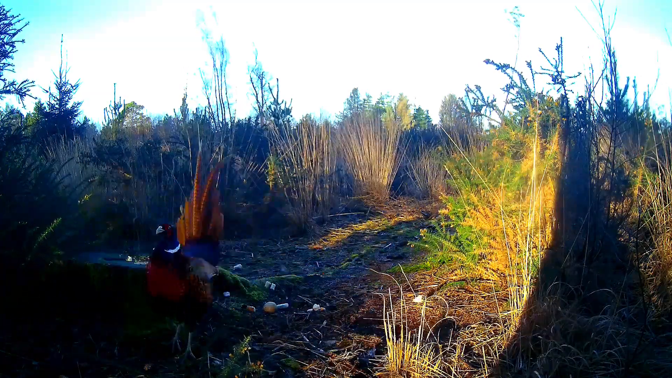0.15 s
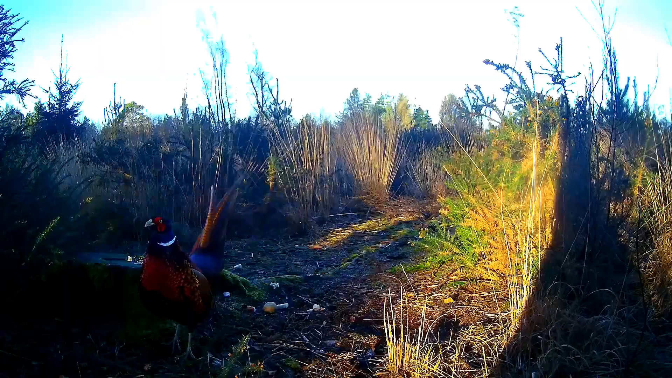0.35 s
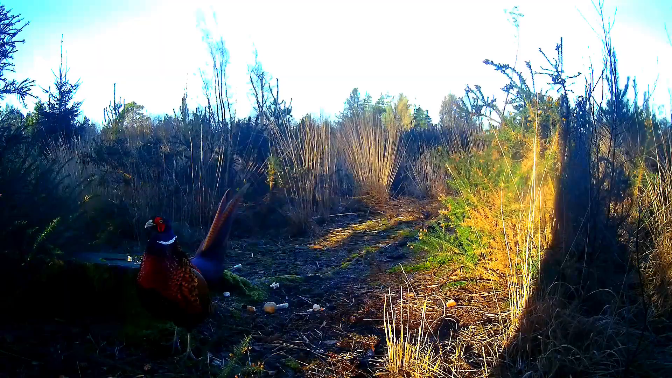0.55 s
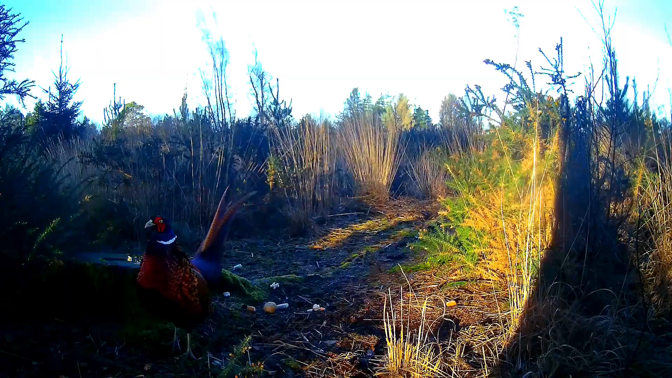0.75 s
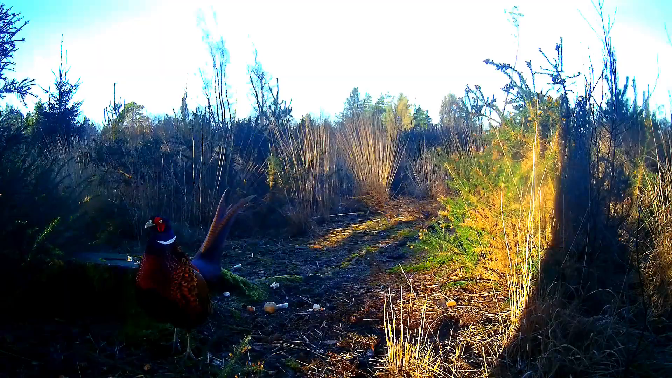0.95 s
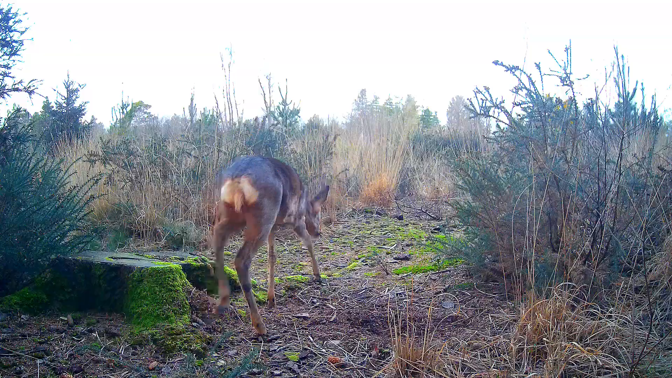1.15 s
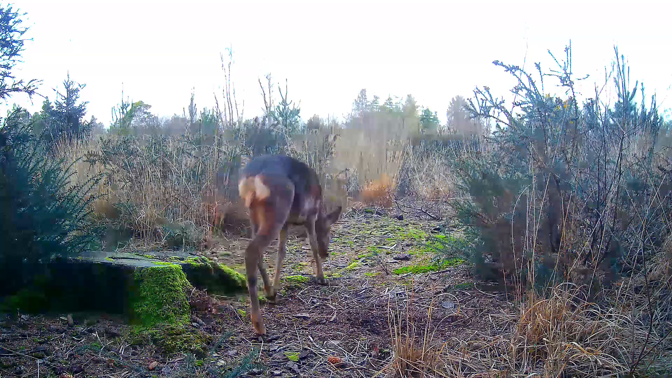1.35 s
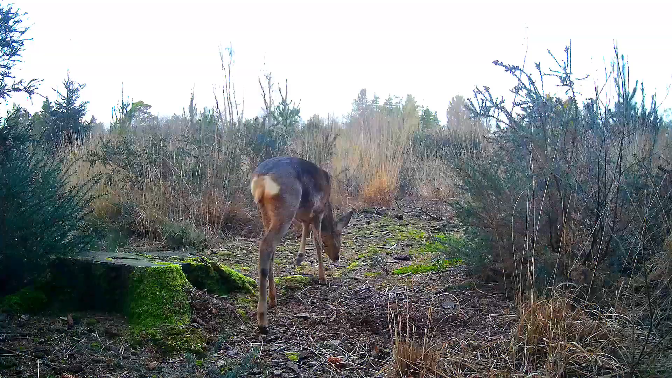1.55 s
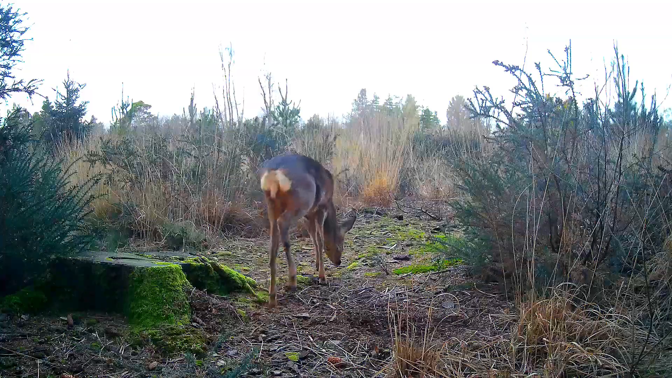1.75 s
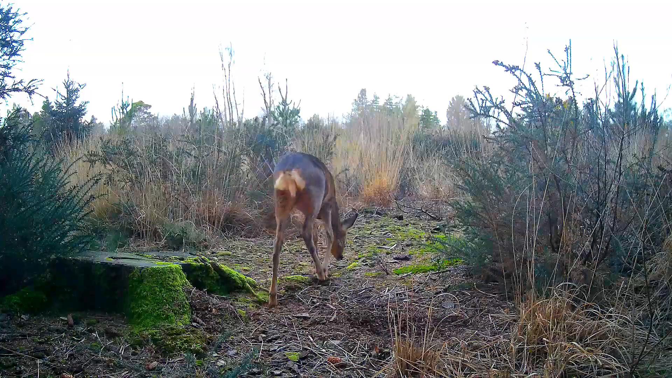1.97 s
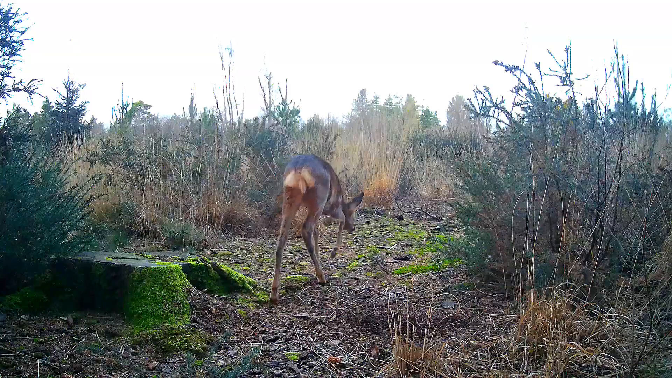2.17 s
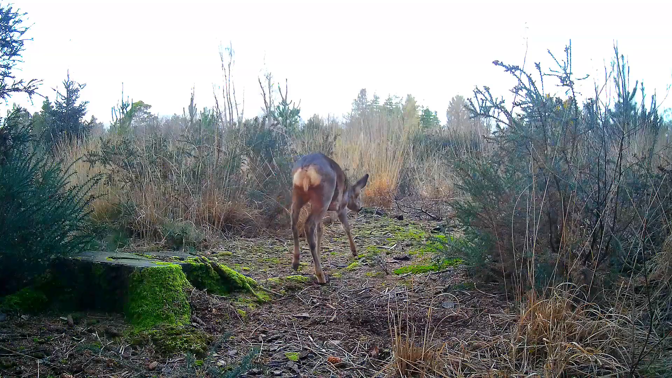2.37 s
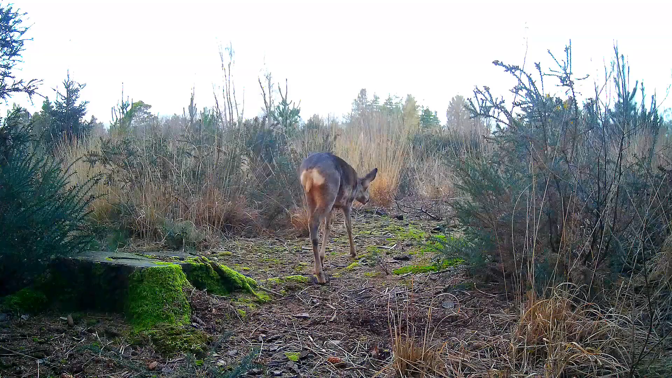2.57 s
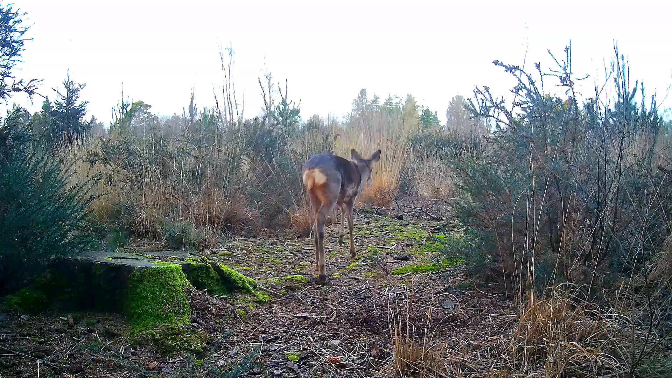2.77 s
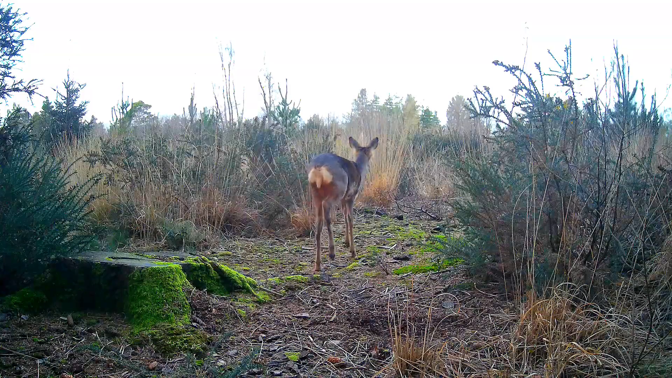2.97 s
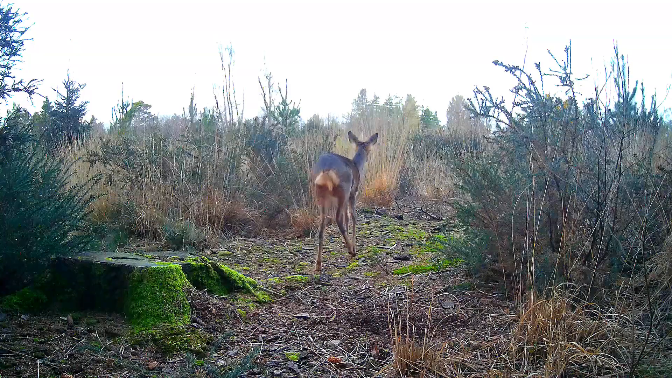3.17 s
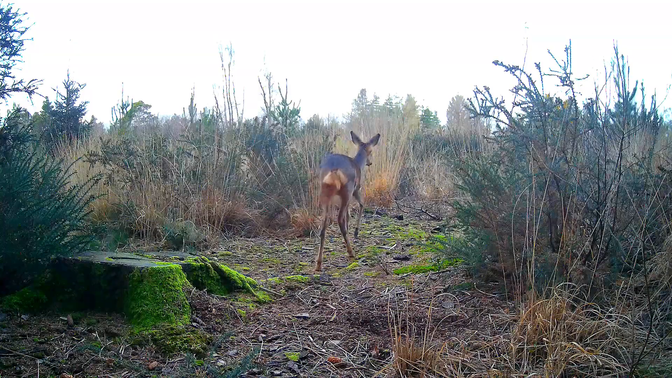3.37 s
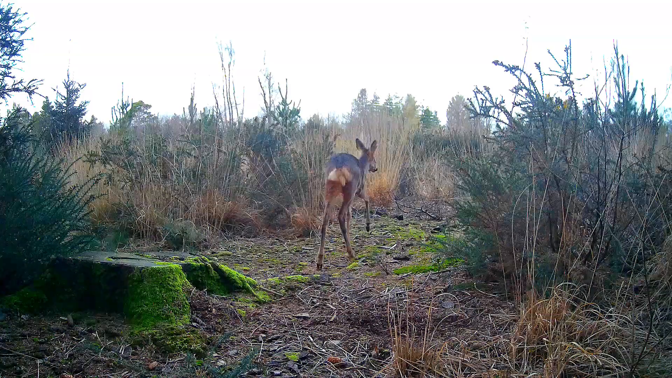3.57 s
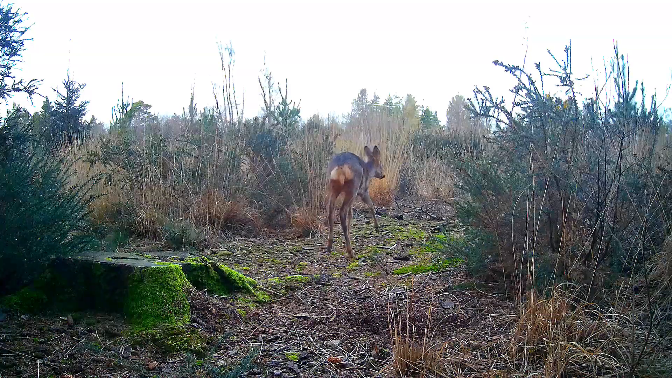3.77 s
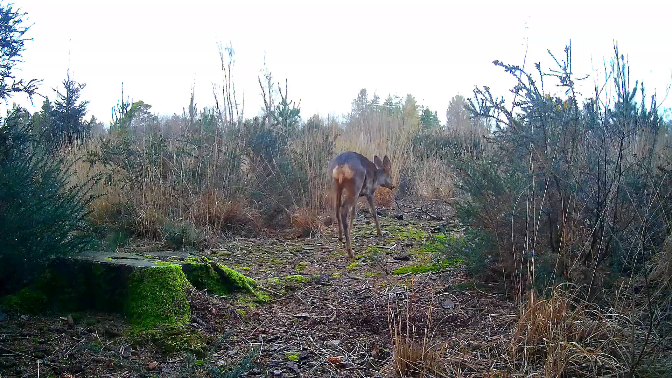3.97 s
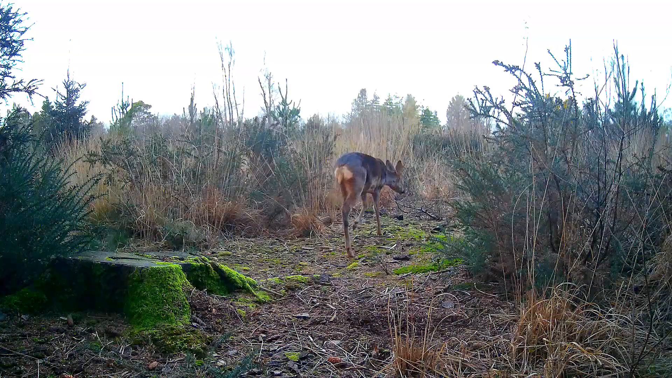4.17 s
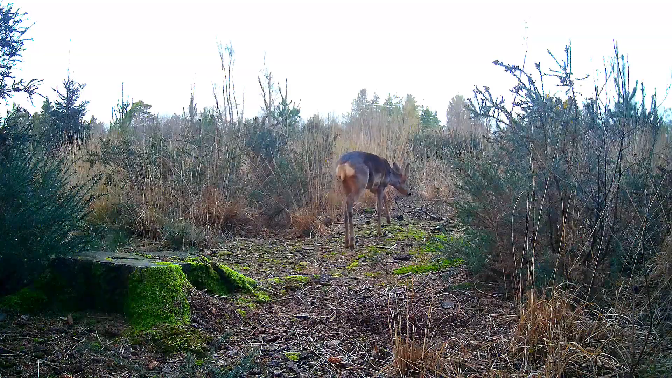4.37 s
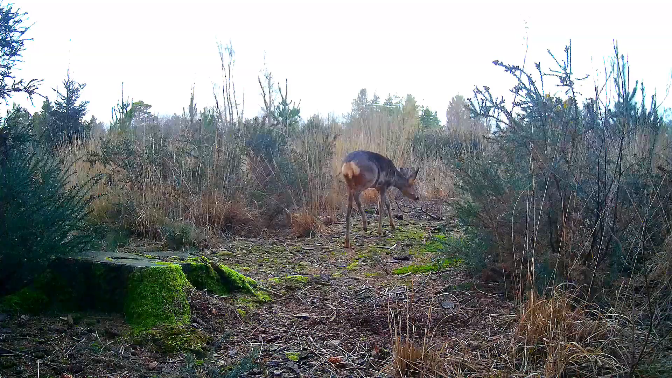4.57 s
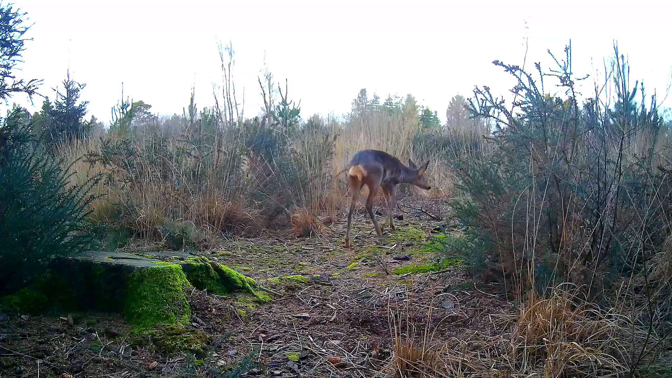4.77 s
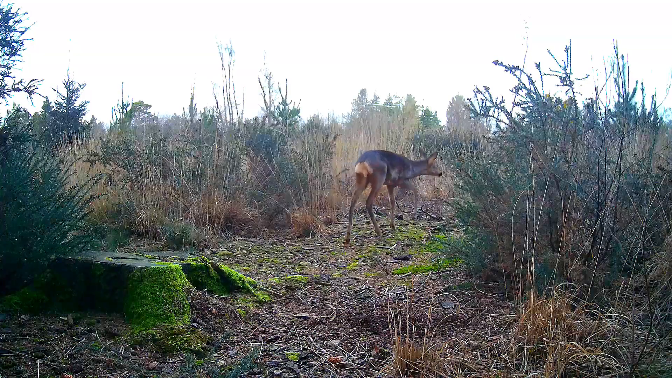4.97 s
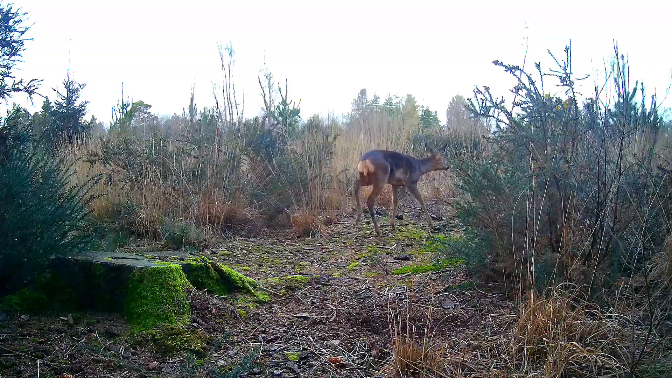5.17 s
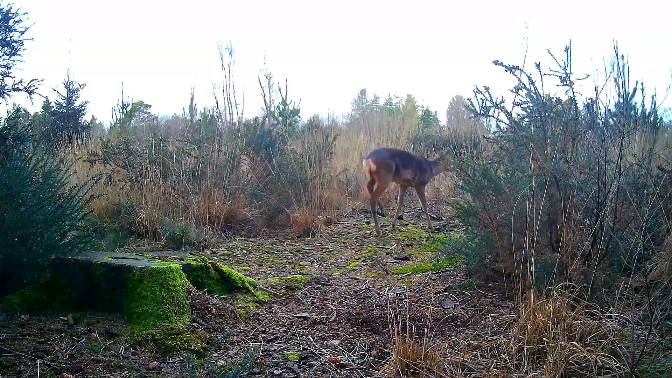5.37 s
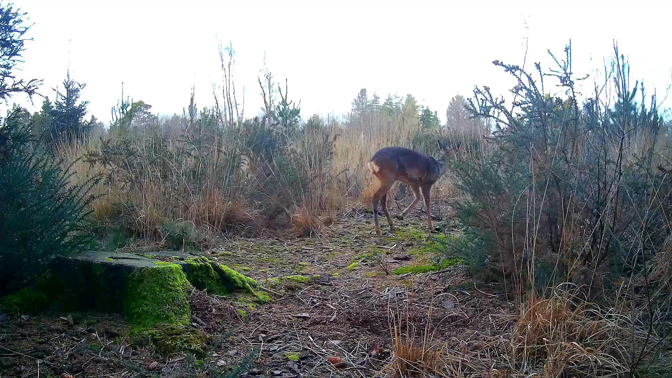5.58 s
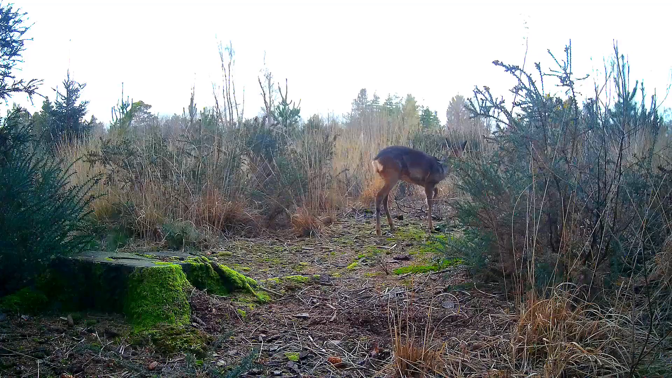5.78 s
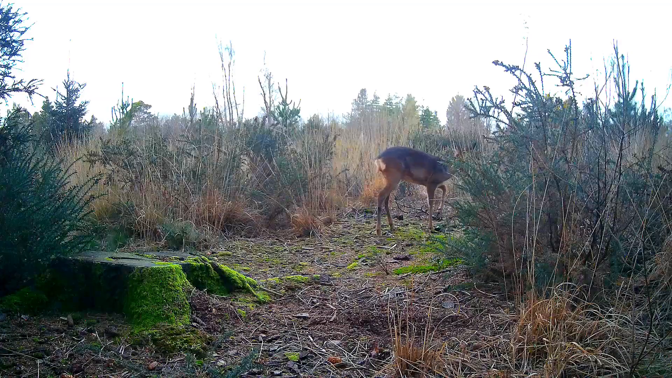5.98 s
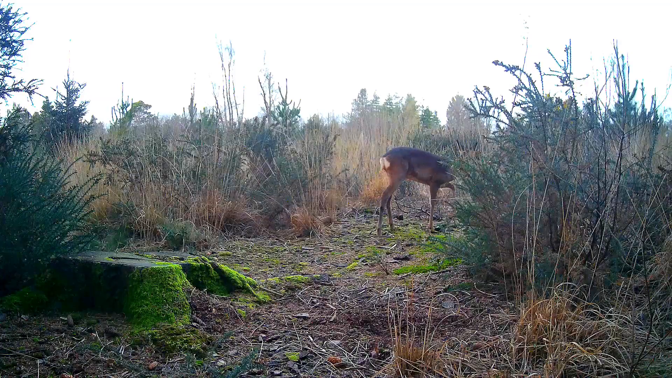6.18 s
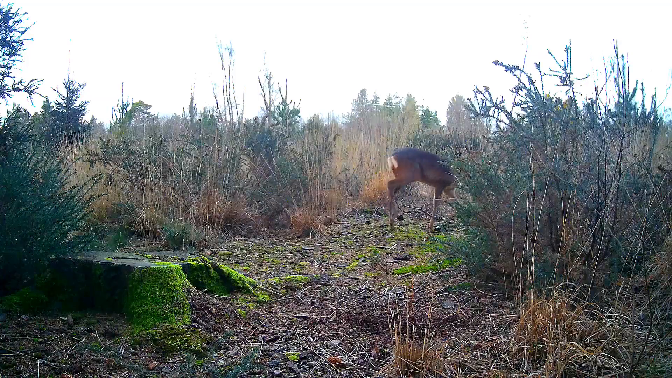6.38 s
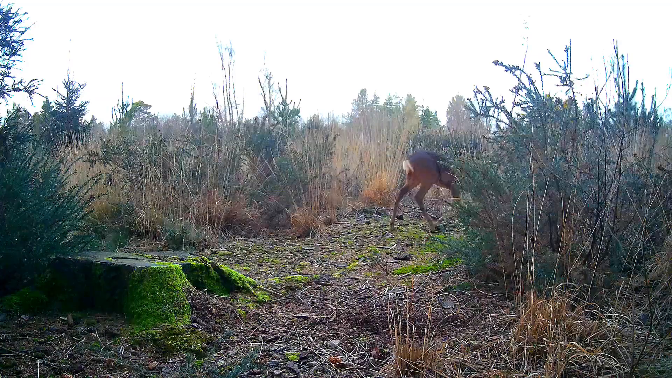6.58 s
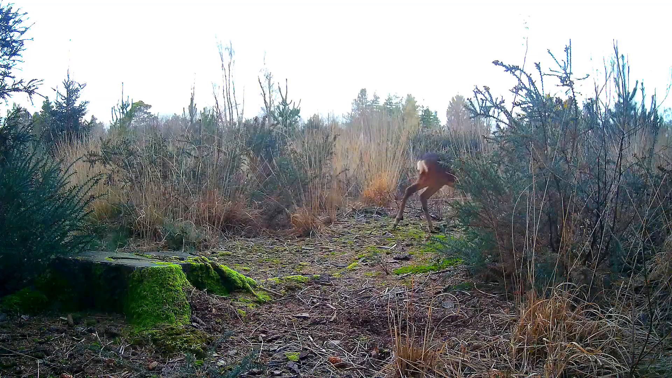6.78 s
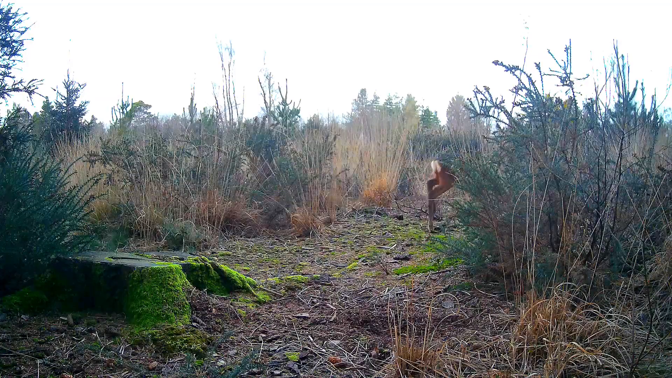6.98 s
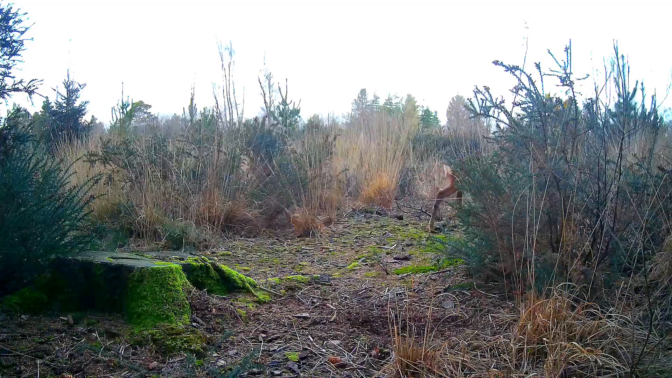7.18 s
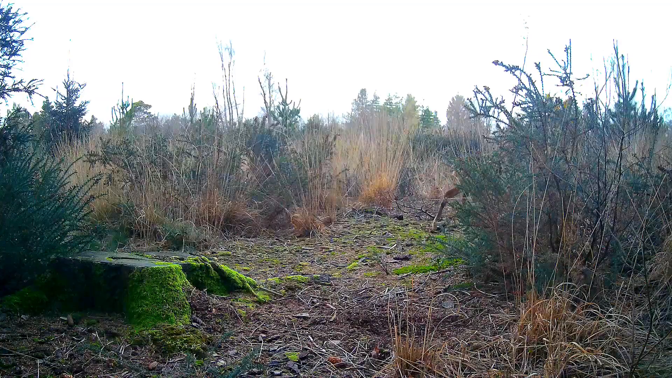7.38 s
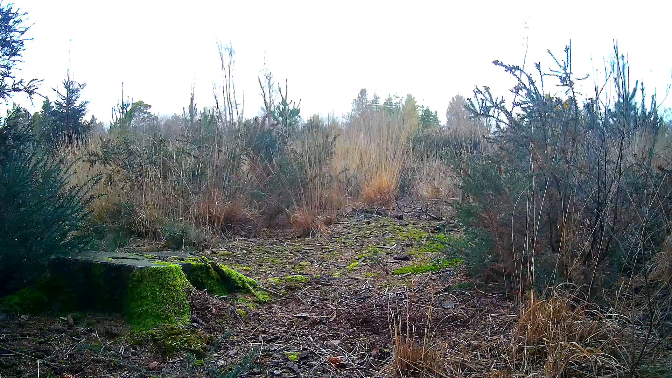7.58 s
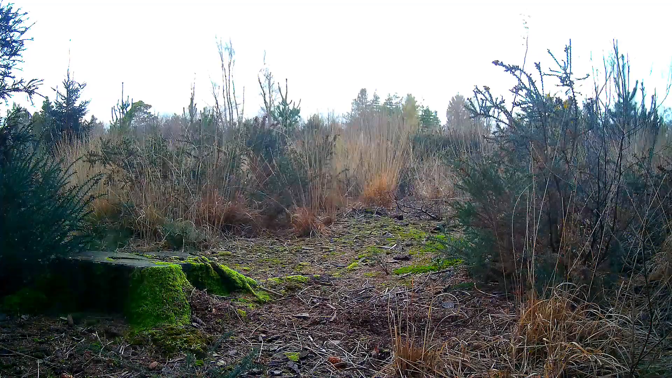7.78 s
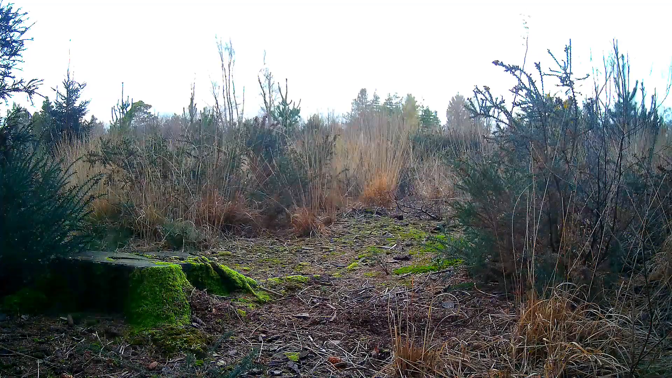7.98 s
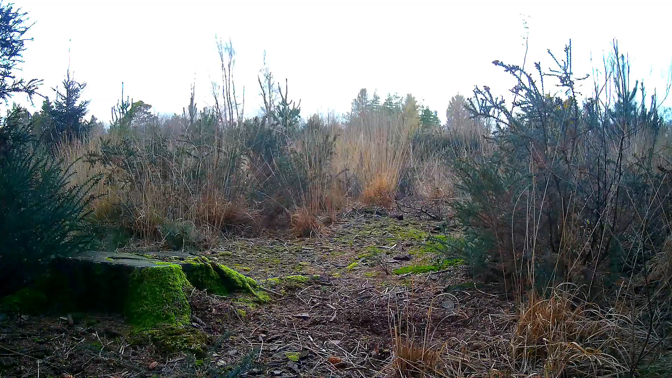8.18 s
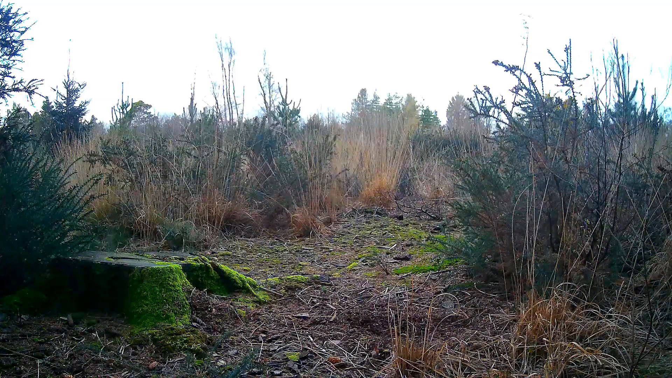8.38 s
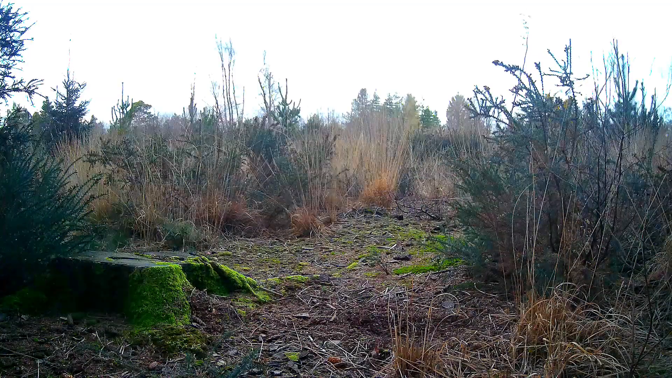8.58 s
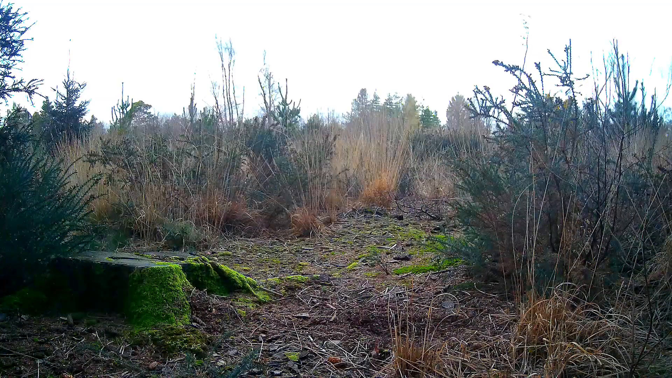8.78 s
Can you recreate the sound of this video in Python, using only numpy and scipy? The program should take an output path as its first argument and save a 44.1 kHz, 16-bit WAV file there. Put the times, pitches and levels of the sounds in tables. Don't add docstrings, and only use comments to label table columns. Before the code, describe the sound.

At a wood's edge, the tail of a pheasant's rapid wing drumming thuds and rustles close and central, gone in a third of a second. A close thrush sings quick bright phrases for nearly two seconds. Fainter, echoing birds follow, with a few dry twig snaps around three seconds. Later come thin distant calls, a high trill and a chattering warbler, over low road hum and small-microphone hiss.

```python
import sys
import numpy as np
from scipy import signal
from scipy.fft import rfft, irfft
from scipy.io import wavfile

SR = 44100
rng = np.random.default_rng(int(sys.argv[2]) if len(sys.argv) > 2 else 0)


def linear_from_db(decibels):
    return 10 ** (np.asarray(decibels, float) / 20)


def store_wav(level_fs):
    pcm = np.round(np.clip(np.atleast_2d(level_fs), -1, 1) * 32767)
    wavfile.write(sys.argv[1], SR, pcm.T.astype(np.int16))


N = 389844

# t/s, depth/dB, width/ms
WING_BEATS = [
    (.0092, -15, 4.2),
    (0.03, -26, 6),
    (.0381, -38, 5.5),
    (0.058, -19.5, 3.9),
    (0.086, -15.5, 3.8),
    (0.096, -22.5, 2.6),
    (0.105, -27, 9.1),
    (.136, -21.5, 2.55),
    (0.1635, -21.5, 4.2),
    (0.1729, -24.5, 2.4),
]
# f/Hz, density/dB
CHURN_SPECTRUM = [(25, 2.5), (60, -5.5), (160, -4.5), (250, -7.5), (380, -10), (600, -67)]
# f/Hz, density/dB
RUSH_SPECTRUM = [(290, -7.5), (500, 0.5), (786, -32), (886, -1), (1140, 4), (2160, -15), (2370, -9),
                 (3170, -21), (4860, -6.5), (7050, -23), (12000, -47), (15600, -63), (22000, -120)]
# t/s, peak level/dB, ring f/Hz
FEATHER_SLAPS = [(.009, -34, 1130), (0.0242, -32, 1090), (.0248, -35.5, 4920), (.0255, -48, 1800),
                 (.055, -39, 1450), (0.0558, -38, 5160), (.08, -33, 1120), (.081, -40.5, 1840),
                 (.094, -34, 1310), (0.1, -37, 4870), (.107, -37, 1220), (0.1334, -32, 1310),
                 (0.169, -41, 1150), (.003, -40, 1180), (.0385, -45, 1300), (.063, -48, 1800),
                 (.088, -34, 1000), (.101, -51, 2380), (.129, -43, 980), (.158, -42, 1000)]
# f/Hz, T60/s, level/dB
CROW_BANDS = [(903, 0.16, -8), (1190, 0.051, -3), (1450, 0.026, -6), (1840, 0.035, -7.5),
              (2370, 0.046, -14.5), (2800, 0.062, -20), (3600, 0.04, -16), (3850, 0.024, -14)]
WINGS_FOLD_S, WHIRR_END_S = 0.17, 0.312
CHURN_DB, CHURN_SAG_DB_PER_S, CHURN_RELEASE_DB_PER_S = -29.5, 82, 328
RUSH_DB, RUSH_SAG_DB_PER_S, RUSH_RELEASE_DB_PER_S = -47, 38, 282
SLAP_RISE_S, SLAP_HISS_DB, CROW_ECHO_DB = 0.0012, -13.5, -48

# f/Hz, density/dB
AIR_SPECTRUM = [(15, -46), (25, 3), (129, -2), (305, -7.5), (1110, -6.5), (3000, -15), (4750, -15),
                (6730, -17), (13900, -18), (15500, -17)]
# f/Hz, side minus mid level/dB
STEREO_WIDTH = [(60, -41), (110, -32), (200, -19), (380, -6), (700, -4), (1290, -4), (2380, -3),
                (4400, -3.5), (8120, -3.5), (15000, -4)]
RUMBLE_TOP_HZ, HUM_TOP_HZ, HISS_TOP_HZ = 340, 2200, 15770
RUMBLE_DB, HUM_DB, HISS_DB, HUM_SAG_DB_PER_S = -67.5, -65.5, -66, 0.24
EARLY_HISS_DB, EARLY_HISS_S = 2, 1
DIP_S, DIP_LENGTH_S, DIP_EDGE_S = 1.09, 0.047, 0.0095
GAP_RUMBLE_DB, GAP_HISS_DB, LATER_RUMBLE_DB = -23, -2, -2.5

# t/s, length/s, rms level/dB, low f/Hz, high f/Hz
RUSTLES = [
    (1.03, .065, -63, 5500, 8500),
    (3.572, .05, -62, 4500, 10000),
    (.045, .16, -65, 8000, 15500),
    (0, .02, -63, 9000, 15500),
    (0.1495, 0.009, -47, 1400, 6500),
]

STROKE_MANNERS = {"swell": (1.07, 9.1, 2.3, 1.2), "scoop": (0.63, 16, 2, 1.5), "hold": (0.39, 2.8, 2, 1.1),
                  "fade": (0.035, 1.9, 9.5, 1.614), "arch": (1.7, 8, 2.5, 1.24),
                  "swoop": (0.096, 2, 11.5, 1.6), "dip": (0.2, 3, 13, 1.7)}
SLUR_S, SLUR_SHARE = 0.004, 0.1
# from t/s, to t/s, swing f/Hz, rate f/Hz
PITCH_BUZZES = [
    (.995, 1.04, 240, 170),
    (6.7, 7.7, 70, 130),
    (2.9, 3.3, 140, 140),
]
# from t/s, to t/s, overtone gain/dB, third over second overtone level/dB
VOICE_STRAINS = [
    (.068, .097, 28.5, -8),
    (.222, .3, 17, -6),
    (0.54, .655, 19, 1),
    (1.35, 1.38, 12, -5),
    (1.78, 1.82, 6, -3),
]
# t/s, length/ms, from f/Hz, goal f/Hz, rms level/dB, manner
THRUSH_SONG = [ (0, 15, 5410, 5180, -48, "fade"), (.022, 6, 6140, 4740, -43, "swell"),
               (.118, 40, 4780, 4770, -61, "fade"), (.048, 29.6, 5810, 4660, -40.5, "fade"),
               (.072, 42, 4745, 4770, -49, "hold"), (.198, 25, 2660, 4300, -50, "scoop"),
               (.222, 28, 4310, 4080, -42.5, "fade"), (.245, 10.2, 4090, 5550, -41, "swell"),
               (.256, 28, 5520, 4160, -42.5, "hold"), (.298, 49, 4400, 4780, -41, "fade"),
               (.408, 15, 4060, 4055, -46, "swell"), (.42, 4.4, 4140, 5030, -42.5, "swell"),
               (.426, 10, 3720, 3100, -53, "swell"), (.436, 12, 3100, 3480, -51, "scoop"),
               (.455, 11, 3360, 3100, -53, "hold"), (.5185, 4.1, 4870, 6260, -44, "hold"),
               (.528, 6.6, 4950, 5340, -38.5, "scoop"), (.534, 18, 5370, 5150, -36, "swoop"),
               (.556, 58, 5200, 5080, -45, "hold"), (.606, 31, 5090, 4940, -44, "hold"),
               (.64, 15, 5040, 5150, -46, "hold"), (.67, 16, 5060, 5130, -41, "swoop"),
               (.694, 5.5, 3250, 3000, -61, "hold"), (.705, 7, 3060, 3780, -49, "scoop"),
               (.712, 12, 3770, 3070, -58, "hold"), (.762, 7.4, 3040, 3500, -50, "scoop"),
               (.769, 18, 3480, 3060, -53.5, "hold"),
               (.814, 8, 4500, 5820, -49, "swell"), (0.823, 11, 5730, 4780, -42.5, "hold"),
                      (.834, 4, 4780, 5030, -41, "hold"), (.8385, 3.6, 4980, 5430, -35, "hold"),
                      (0.843, 8, 5410, 6480, -44.5, "hold"), (.851, 14, 6450, 6700, -42.5, "fade"),
                      (.915, 58, 4840, 4830, -59, "fade"), (.915, 75, 6580, 6670, -61, "fade"),
                      (.935, 27, 3140, 3270, -58, "hold"), (0.966, 40, 3260, 3980, -50.5, "swell"),
                      (1.003, 33, 4040, 3840, -47, "hold"), (1.06, 4.6, 3970, 5320, -43.5, "swell"),
                      (1.0655, 3.6, 5360, 4770, -46, "hold"), (1.079, 11, 4250, 5320, -34.5, "scoop"),
                      (1.089, 9.7, 5330, 5250, -34.5, "hold"), (1.102, 10, 5320, 4430, -43.5, "hold"),
                      (1.116, 5.1, 5410, 4360, -42, "swell"), (1.172, 18.5, 4780, 4710, -43.5, "hold"),
                      (1.21, 24, 4750, 4850, -49, "hold"), (1.235, 19, 4420, 4630, -41, "scoop"),
               (1.32, 32, 2534, 4360, -53, "scoop"), (1.354, 21, 4480, 4446, -47, "hold"),
                     (1.368, 35, 4340, 3994, -47, "hold"), (1.47, 26, 2870, 3330, -54.5, "arch"),
                     (1.5, 25, 3170, 2826, -57, "hold"), (1.524, 21, 2854, 3125, -53, "arch"),
                     (1.547, 17.4, 2820, 3140, -54.5, "swell"), (1.5, 60, 5870, 5930, -66.5, "hold"),
                     (1.638, 24, 5000, 5970, -46, "hold"), (1.659, 6.3, 5930, 5900, -47, "hold"),
                     (1.665, 12, 5820, 5030, -42.5, "hold"), (1.679, 27, 5030, 5400, -40.5, "hold"),
                     (1.746, 5.6, 3640, 4650, -48, "scoop"), (1.752, 6.6, 4650, 4670, -46, "hold"),
                     (1.758, 8.8, 4600, 3100, -53, "fade"), (1.771, 10, 2955, 4770, -43, "scoop"),
                     (1.78, 20.4, 4800, 5250, -38, "swell"), (1.801, 10.3, 5390, 5240, -37.5, "hold"),
                     (1.816, 26, 5180, 4430, -44.5, "hold")]
DEEP_CALLS = [
    (1.7, 210, 5900, 5880, -72, "fade"),
    (3.14, 140, 4600, 5800, -81, "hold"),
    (2.5, 245, 6850, 6830, -82, "hold"),
    (2.57, 114, 5000, 5400, -80, "hold"),
    (2.82, 140, 5100, 4200, -77, "hold"),
    (7.86, 60, 5500, 5900, -75, "hold"),
    (1.59, 45, 5150, 5350, -68, "swell"),
]
SECOND_THRUSH_SONG = [ (2.196, 13, 5700, 4880, -59.5, "swell"),
                      (2.24, 12, 3580, 4600, -62.5, "scoop"), (2.252, 97, 4680, 4610, -67, "hold"),
                      (2.345, 20, 4570, 4100, -68, "hold"), (2.37, 110, 4040, 3950, -80, "hold"),
                      (2.343, 80, 5480, 6500, -63.5, "scoop"),
                      (2.548, 11, 4120, 5090, -62, "swell"), (2.566, 12, 5750, 4760, -63, "hold"),
                      (2.58, 20, 3900, 3400, -70, "hold"), (2.612, 38, 3550, 3840, -72, "scoop"),
                      (2.72, 25, 5460, 5300, -66, "hold"), (2.75, 12, 6800, 6970, -65, "fade"),
                      (2.762, 28, 6970, 5680, -65, "swell"), (2.828, 52, 5560, 5370, -63.5, "fade"),
                      (2.878, 15.7, 7100, 6100, -61.5, "swell"),
                      (2.915, 15, 5100, 5000, -71, "hold"),
                      (2.963, 14, 4050, 3300, -69, "hold"), (2.985, 69, 4586, 4650, -61, "hold"),
                            (3.056, 62, 4640, 4646, -61, "fade"), (3.09, 40, 3550, 3540, -74, "hold"),
                            (3.272, 60, 5800, 5900, -74, "fade"), (3.292, 17, 5500, 4800, -66, "hold"),
                            (3.32, 13, 3540, 5560, -76, "hold"), (3.337, 120, 5570, 5640, -70, "swoop"),
                            (3.418, 61, 6990, 6710, -62, "hold"), (3.48, 40, 6710, 6260, -62, "hold"),
                            (3.52, 42, 6250, 5530, -66, "fade"), (3.574, 24, 1850, 3400, -64, "hold"),
                            (3.598, 21, 3400, 4480, -57, "hold"), (3.619, 47, 4500, 4350, -52, "swoop"),
                            (3.58, 24, 3950, 7400, -64, "swell")]
FAR_CALLS = [ (4.01, 85, 4900, 5700, -74, "hold"), (4.57, 50, 7000, 7600, -75, "hold"),
             (4.65, 45, 4650, 4900, -80, "hold"), (5.31, 14, 4750, 4850, -72, "hold"),
             (5.598, 45, 6250, 5550, -72, "scoop"), (5.652, 45, 5250, 4450, -77, "hold"),
             (5.608, 28, 3500, 3460, -72, "hold"), (5.76, 65, 4200, 4050, -74, "scoop"),
             (5.53, 40, 3900, 4000, -79, "hold"), (5.86, 60, 8500, 8400, -75, "hold"),
             (7.885, 28, 5850, 5850, -69, "hold"), (7.993, 50, 4960, 4900, -67, "fade"),
             (7.91, 22, 4900, 4800, -71, "hold")]
LOW_SONG = [ (6.06, 14, 3780, 3760, -71, "hold"), (6.11, 29, 3640, 3370, -71, "hold"),
            (6.145, 27, 3350, 3780, -59.5, "swell"), (6.172, 10, 3780, 3730, -62, "hold"),
            (6.178, 18, 3350, 3290, -64, "hold"), (6.194, 42, 3330, 3830, -61, "swell"),
            (6.238, 14.8, 3890, 3836, -58, "hold"), (6.258, 41, 3850, 3850, -67, "fade"),
            (6.25, 77, 3400, 3450, -72.5, "hold"), (6.335, 68, 3910, 3860, -78, "hold"),
            (6.29, 20, 4980, 4800, -76, "hold"), (8.64, 96, 4690, 4010, -62.5, "swoop"),
            (8.725, 12.4, 4000, 4500, -53.5, "swell"), (8.736, 11.4, 4560, 4520, -55, "hold"),
            (8.815, 9, 3790, 3780, -62, "hold"), (8.826, 13, 4360, 2830, -57, "swell")]
HIGH_SONG = [ (6.905, 50, 7300, 7160, -64.5, "hold"), (6.965, 17, 7150, 6800, -63, "fade"),
             (7.035, 11, 7000, 7240, -65, "scoop"), (7.047, 61, 7230, 7150, -66, "hold"),
             (7.255, 81, 8370, 7970, -58, "swell"), (7.265, 25, 7510, 7650, -63, "scoop"),
             (7.345, 25, 7660, 7960, -61, "swell"), (7.37, 40, 8000, 7340, -59, "fade"),
             (7.348, 82, 9200, 8080, -50, "scoop"), (7.43, 56, 8100, 7970, -47, "fade"),
             (7.475, 61, 7950, 7230, -59, "hold"), (7.525, 150, 7250, 7200, -66, "fade")]
WARBLER_SONG = [ (7.789, 9.4, 3850, 4120, -58, "hold"), (7.802, 10, 3540, 2620, -53, "hold"),
                (7.812, 27, 3030, 2170, -57.5, "hold"), (7.837, 25, 2160, 2080, -53, "swoop"),
                (7.827, 7, 3230, 3530, -62, "swell"), (7.822, 14, 5000, 4320, -67, "hold"),
                (7.836, 30, 4330, 4150, -66, "hold"), (7.942, 6.4, 3360, 4040, -59, "hold"),
                (7.958, 5.8, 2930, 3800, -62, "fade"), (7.964, 20, 2810, 2060, -57.5, "fade"),
                (7.978, 20, 3375, 3430, -55.5, "fade"), (8.003, 22, 3360, 3470, -66, "hold"),
                (8.033, 8, 3600, 4100, -52.5, "swell"), (7.877, 14, 2700, 2800, -70, "hold"),
                (7.883, 10, 2000, 2030, -71, "hold"), (8.0, 5, 1530, 2080, -60, "swell"),
                (8.022, 15, 1700, 1880, -67, "fade"),
                (8.051, 7, 2100, 2600, -67, "hold"), (8.063, 6.4, 2710, 2750, -61, "hold"),
                      (8.075, 12, 2920, 2650, -64, "hold"), (8.111, 6, 3020, 2820, -64, "hold"),
                      (8.112, 5, 4080, 3850, -68, "hold"), (8.21, 5, 2500, 2950, -65, "hold"),
                      (8.078, 13.5, 3590, 4020, -53.5, "swell"), (8.099, 11, 2590, 3310, -58.5, "arch"),
                      (8.118, 22, 2260, 2340, -61, "swell"), (8.133, 10, 3600, 4000, -58, "arch"),
                      (8.12, 20, 4580, 4670, -65, "swell"), (8.15, 7.3, 2500, 3130, -61, "hold"),
                      (8.158, 21, 3140, 2400, -68, "fade"), (8.186, 7, 3850, 3530, -54, "hold"),
                      (8.199, 4.4, 2210, 2860, -59, "swell"), (8.231, 29, 3300, 3490, -68, "hold"),
                      (8.296, 23, 2890, 3250, -69, "hold")]
# t/s, top f/Hz, rms level/dB
VEE_CALLS = [
    (4.232, 5950, -72.5),
    (4.714, 5420, -67.5),
    (5.181, 5460, -71),
]
VEE_FALL_MS, VEE_FALL_SHARE, VEE_TURN_S = 110, 0.7, 0.12
VEE_RISE_MS, VEE_RISE_SHARE, VEE_RISE_LOSS_DB = 55, 0.76, 3
# t/s, rms level/dB, rise delay/s
DEEP_FIGURES = [
    (6.27, -74, .275),
    (6.82, -72, .295),
    (7.38, -71, 0.34),
]
# delay/s, length/ms, from f/Hz, goal f/Hz, loss/dB, manner
DEEP_FALL, DEEP_FLICK = (0, 135, 5150, 4080, 0, "hold"), (0.14, 45, 4350, 5150, 1.5, "hold")
DEEP_RISE = (0, 170, 4850, 6260, 0.34, "fade")
DEEP_LOW = (0.131, 97, 4070, 4050, 5.2, "fade")
DEEP_RETURN_S, DEEP_RETURN_DB = 0.065, -12.5
SINGER_PERCHES = {"thrush": (1.2, 36.5, -2.5, -13, -38, 2), "high": (-5.7, 6.8, -8.5, -9, -36, 0.6),
                  "far": (8.5, 33, -4, -8, -41, 2.2), "low": (-9, 2, 5, -5, -36, 4),
                  "warbler": (-8, 6, -2, -4, -28, 2), "second thrush": (-9, 13, 3.5, -9, -34, 3),
                  "deep": (3, 25, 7, 2, -41, 3.5)}
WOOD_T60_S, FIRST_ECHO_S = 0.42, 0.0041
FAR_TREES_S, FAR_TREES_T60_S, WOOD_LEFT_RIGHT_DB = 0.12, 0.98, -0.5

# t/s, peak level/dB, ring f/Hz, left-right/dB
TWIG_SNAPS = [
    (2.556, -42, 2920, 6),
    (3.205, -30.5, 2730, 5.5),
    (3.7174, -50, 5600, 0.0),
]


def rms_one(x):
    return x / np.sqrt(np.mean(x ** 2) + 1e-20)


def drift(rate_hz):
    r = np.exp(-2 * np.pi * rate_hz / SR)
    return rms_one(signal.lfilter([1], [1, -2 * r, r * r], rng.standard_normal(N)))


def at_hz(points, hz):
    f, level_db = np.array(points).T
    return np.interp(np.log(hz + 1), np.log(f), level_db)


def panned(x, left_right_db):
    return x * linear_from_db(np.array([[0.5], [-0.5]]) * left_right_db)


def coloured(spectrum, low_hz=0, high_hz=SR, side_db=0):
    hz = np.fft.rfftfreq(N, 1 / SR)
    shape = linear_from_db(at_hz(spectrum, hz)) * (hz > low_hz) * (hz <= high_hz)
    mid, side = rfft(rng.standard_normal((2, N))) * shape
    mid = irfft(mid, N)
    side = irfft(side * linear_from_db(at_hz(STEREO_WIDTH, hz) + side_db), N)
    return np.array([mid + side, mid - side]) / np.std(mid)


def ring(clicks, hz, t60):
    r, w = linear_from_db(-60 / (t60 * SR)), 2 * np.pi * hz / SR
    return signal.lfilter([0, np.sin(w)], [1, -2 * r * np.cos(w), r * r], clicks + 1e-18)


def wings():
    t, strokes, slaps = np.arange(N) / SR, np.zeros(N), np.zeros(N)
    for s, depth_db, width_ms in WING_BEATS:
        u = (t[:SR] - s) / (width_ms * 0.00066)
        strokes[:SR] -= linear_from_db(depth_db) * (1 - u ** 2 / 1.37) * np.exp(-u ** 2 / 2)
    for s, slap_db, hz in FEATHER_SLAPS:
        since = np.maximum(t[:SR] - s, 0)
        clap = linear_from_db(slap_db) * since / SLAP_RISE_S * np.exp(1 - since / SLAP_RISE_S)
        strokes[:SR] += clap * np.sin(2 * np.pi * hz * since)
        slaps[:SR] += linear_from_db(SLAP_HISS_DB) * clap
    beating, folded = np.minimum(t, WINGS_FOLD_S), np.maximum(t - WINGS_FOLD_S, 0)
    churn_db = CHURN_DB - CHURN_SAG_DB_PER_S * beating - CHURN_RELEASE_DB_PER_S * folded
    rush_db = RUSH_DB - RUSH_SAG_DB_PER_S * beating - RUSH_RELEASE_DB_PER_S * folded
    churn = linear_from_db(churn_db) * coloured(CHURN_SPECTRUM, side_db=-47)
    rush = (linear_from_db(rush_db) + slaps) * coloured(RUSH_SPECTRUM, side_db=-46)
    breath = rng.standard_normal(N)
    echo = sum(linear_from_db(db) * rms_one(ring(breath, hz, t60)) for hz, t60, db in CROW_BANDS)
    echo_db = rush_db - RUSH_DB + CROW_ECHO_DB + 3.1 * drift(66)
    over = np.clip((WHIRR_END_S - t) / 0.03, 0, 1)
    return strokes + over * (churn + rush + linear_from_db(echo_db) * echo)


def background():
    t = np.arange(N) / SR
    gap = np.clip(np.minimum(t - DIP_S, DIP_S + DIP_LENGTH_S - t) / DIP_EDGE_S, 0, 1)
    later = t > DIP_S + DIP_EDGE_S
    rumble_db = RUMBLE_DB + LATER_RUMBLE_DB * later + GAP_RUMBLE_DB * gap
    hum_db = HUM_DB - HUM_SAG_DB_PER_S * t
    hiss_db = HISS_DB + EARLY_HISS_DB * np.exp(-t / EARLY_HISS_S) + GAP_HISS_DB * gap
    rumble = linear_from_db(rumble_db) * coloured(AIR_SPECTRUM, 20, RUMBLE_TOP_HZ)
    hum = linear_from_db(hum_db) * coloured(AIR_SPECTRUM, RUMBLE_TOP_HZ, HUM_TOP_HZ)
    hiss = linear_from_db(hiss_db) * coloured(AIR_SPECTRUM, HUM_TOP_HZ, HISS_TOP_HZ)
    return rumble + hum + hiss


def rustles():
    out, t = np.zeros((2, N)), np.arange(N) / SR
    for s, length_s, level_db, low_hz, high_hz in RUSTLES:
        swell = np.sin(np.pi * np.clip((t - s) / length_s, 0, 1))
        hiss = coloured(AIR_SPECTRUM, low_hz, high_hz, side_db=-15)
        out += linear_from_db(level_db + 0.99 * drift(60)) * swell * hiss
    return out


def songs():
    vees = []
    for s, hz, db in VEE_CALLS:
        vees.append((s, VEE_FALL_MS, hz, VEE_FALL_SHARE * hz, db, "dip"))
    for s, hz, db in VEE_CALLS:
        vees.append((s + VEE_TURN_S, VEE_RISE_MS, VEE_RISE_SHARE * hz, hz, db - VEE_RISE_LOSS_DB, "hold"))
    rounds = []
    for s, db, pause in DEEP_FIGURES:
        for wait, stroke in [(0, DEEP_FALL), (0, DEEP_LOW), (0, DEEP_FLICK), (pause, DEEP_RISE)]:
            after, ms, from_hz, goal_hz, loss_db, manner = stroke
            rounds.append((s + wait + after, ms, from_hz, goal_hz, db - loss_db, manner))
    returns = [(s + DEEP_RETURN_S, ms, from_hz, goal_hz, db + DEEP_RETURN_DB, manner)
               for s, ms, from_hz, goal_hz, db, manner in rounds]
    return {"thrush": THRUSH_SONG,
            "deep": DEEP_CALLS + rounds + returns,
            "second thrush": SECOND_THRUSH_SONG,
            "far": FAR_CALLS + vees, "low": LOW_SONG, "high": HIGH_SONG,
            "warbler": WARBLER_SONG}


def notes(strokes):
    song, u = [], np.linspace(0, 1, num=9)
    for s, length_ms, from_hz, goal_hz, level_db, manner in strokes:
        loudest, swell_db, fade_db, ease = STROKE_MANNERS[manner]
        way = np.sin(np.pi * u) ** ease if manner == "arch" else 1 - (1 - u) ** ease
        shape_db = np.interp(u, [0, np.clip(loudest, 0, 1), 1], [-swell_db, 0, -fade_db])
        pitch = from_hz + (goal_hz - from_hz) * way
        note = np.transpose([s + u * length_ms / 1000, pitch, level_db + shape_db])
        if song:
            _, last_hz, _ = song[-1][-1]
            near_in_time = abs(s - song[-1][-1, 0]) < SLUR_S
            if near_in_time and abs(from_hz / last_hz - 1) < SLUR_SHARE:
                before = song.pop()
                note = np.vstack([before[before[:, 0] < note[1, 0]], note[1:]])
        song.append(note)
    return song


def whistle(song, lead_us, overtone_db):
    out, unsteady = np.zeros((2, N)), 1 + 0.003 * drift(55)
    for note in song:
        s, hz, level_db = np.transpose(note)
        first, last = round((s[0] - 0.002) * SR), round((s[-1] + 0.0013) * SR)
        at = np.arange(max(first, 0), min(last, N))
        t = at / SR
        pitch = np.interp(t, s, hz) * unsteady[at]
        for start, end, swing_hz, rate_hz in PITCH_BUZZES:
            pitch += swing_hz * np.sin(2 * np.pi * rate_hz * t) * (t > start) * (t < end)
        lead_turns = pitch * lead_us / 10 ** 6 * [[0.5], [-0.5]]
        phase = 2 * np.pi * (np.cumsum(pitch) / SR + lead_turns)
        fade = np.clip(np.minimum(t - t[0], t[-1] - t) / 0.0019, 0, 1)
        strain_db = sum(gain_db * (t > start) * (t < end) for start, end, gain_db, _ in VOICE_STRAINS)
        third_db = sum(db * (t > start) * (t < end) for start, end, _, db in VOICE_STRAINS)
        overtones = np.sin(2 * phase) + linear_from_db(third_db) * np.sin(3 * phase)
        tone = np.sin(phase) + linear_from_db(overtone_db + strain_db) * overtones
        level = np.sqrt(2) * linear_from_db(np.interp(t, s, level_db))
        out[:, at] += level * np.sin(fade * np.pi / 2) ** 2 * tone
    return out


def wood(x, far_trees_db):
    t = np.arange(SR) / SR
    far = linear_from_db(far_trees_db - 60 * t / FAR_TREES_T60_S) * np.minimum(t / FAR_TREES_S, 1) ** 2
    decay = (linear_from_db(-60 * t / WOOD_T60_S) + far) * np.clip(t / FIRST_ECHO_S - 1, 0, 1)
    cloud = rng.standard_normal((2, SR)) * decay / np.sqrt(np.sum(decay ** 2))
    leaves = signal.butter(2, 9500, fs=SR, output="sos")
    cloud = signal.sosfilt(leaves, cloud)
    return signal.oaconvolve(x[None], cloud, axes=1)[:, :N]


def singers():
    out = np.zeros((2, N))
    for singer, strokes in songs().items():
        left_right_db, lead_us, echo_db, far_trees_db, overtone_db, shimmer_db = SINGER_PERCHES[singer]
        voice = whistle(notes(strokes), lead_us, overtone_db)
        direct = linear_from_db(shimmer_db * drift(60)) * voice
        out += panned(direct, left_right_db)
        out += panned(linear_from_db(echo_db) * wood(voice[0], far_trees_db), WOOD_LEFT_RIGHT_DB)
    return out


def twigs():
    out = np.zeros((2, N))
    for s, peak_db, hz, left_right_db in TWIG_SNAPS:
        click = np.zeros(N)
        click[round(s * SR) + 20] = -linear_from_db(peak_db - 7.0)
        snap = ring(click, hz, 0.0087)
        snap += 1.1 * ring(click, 1.48 * hz, 0.0038)
        snap += 0.33 * ring(click, 3.2 * hz, 0.002)
        snap += 0.1 * ring(click, 0.48 * hz, 0.027)
        out += panned(snap, left_right_db)
    return out


def scene():
    return wings() + background() + rustles() + singers() + twigs()


def roll_off(x):
    return signal.sosfilt(signal.butter(12, 15775, fs=SR, output="sos"), x)


def record(dry):
    low_pass = signal.cheby2(14, 60, 1.03 * HISS_TOP_HZ, fs=SR, output="sos")
    finished = signal.sosfilt(low_pass, dry)
    return roll_off(finished)


dry = scene()
out = record(dry)
store_wav(out)
```